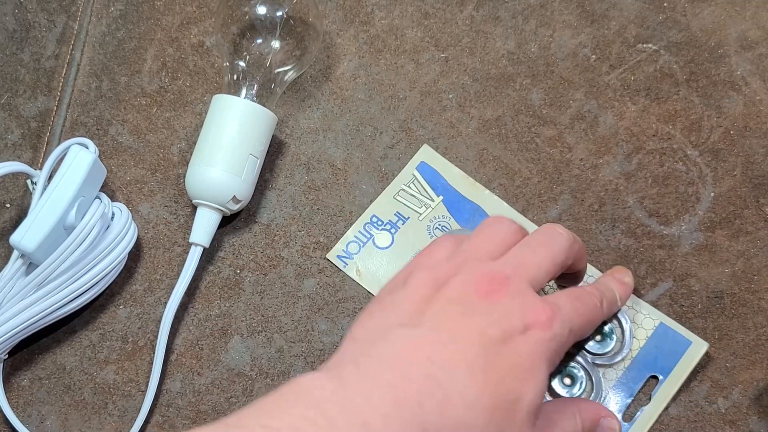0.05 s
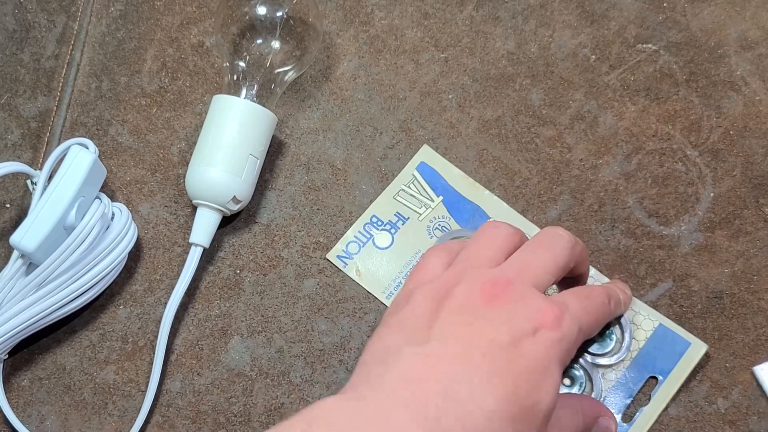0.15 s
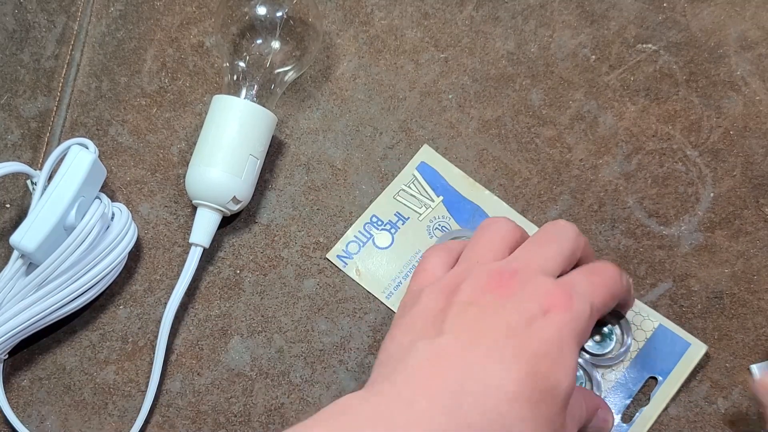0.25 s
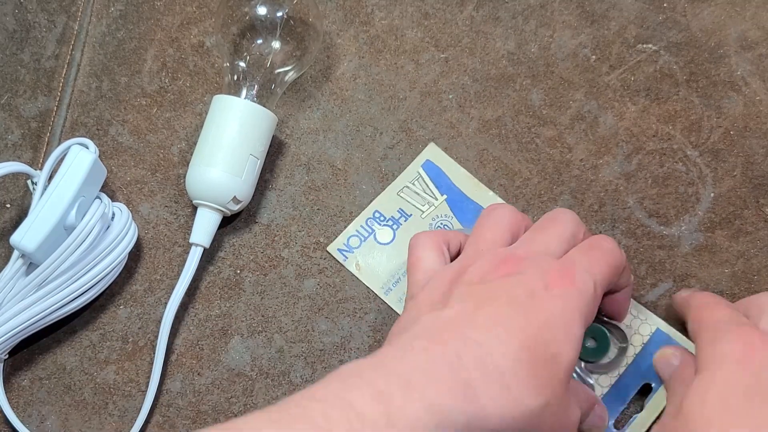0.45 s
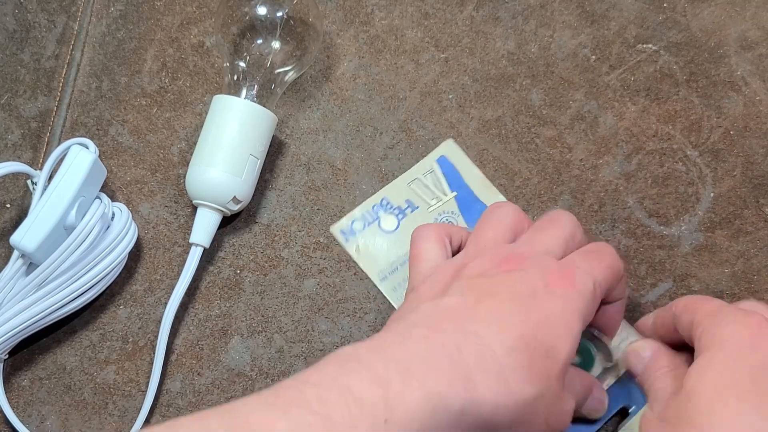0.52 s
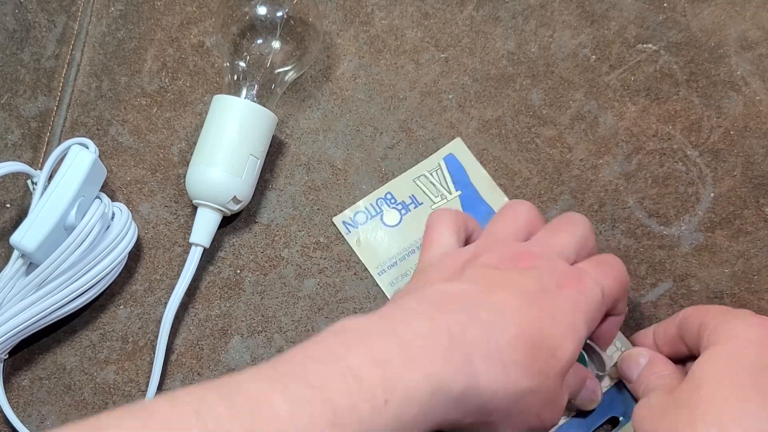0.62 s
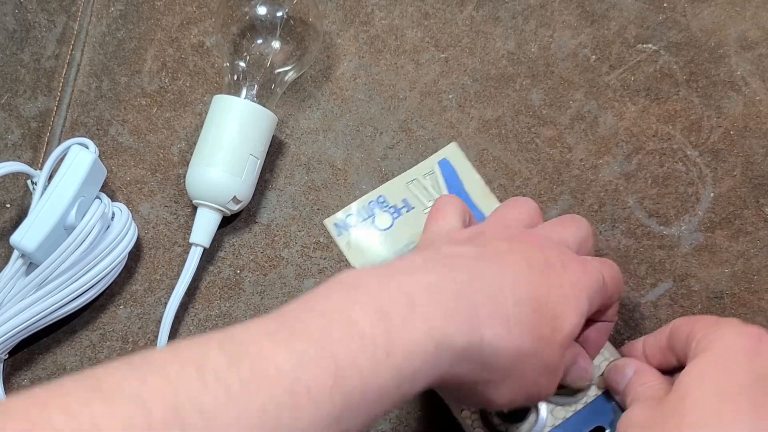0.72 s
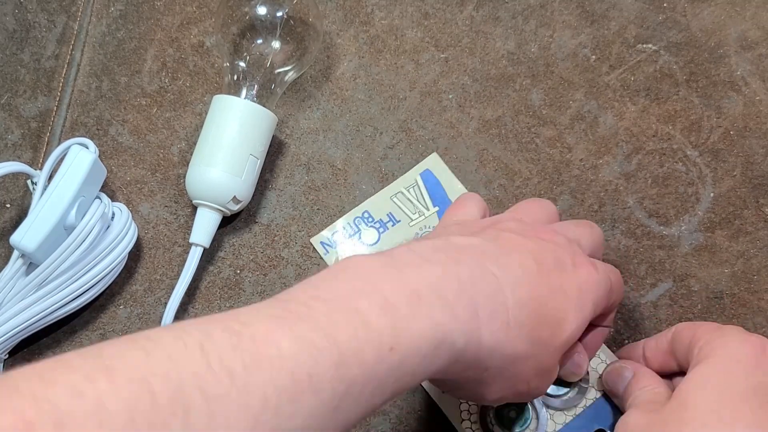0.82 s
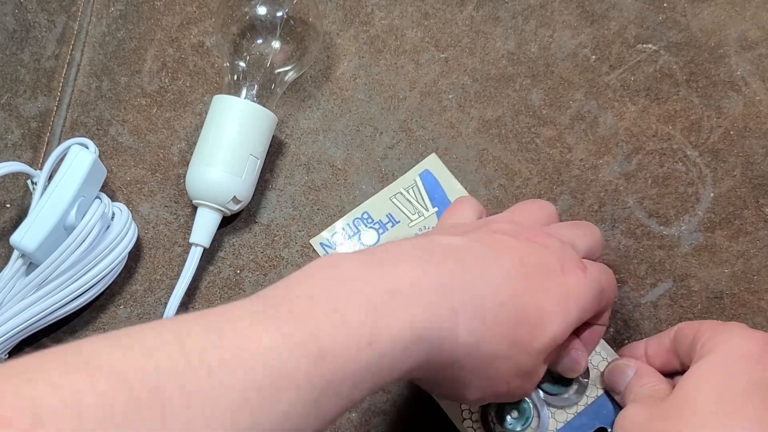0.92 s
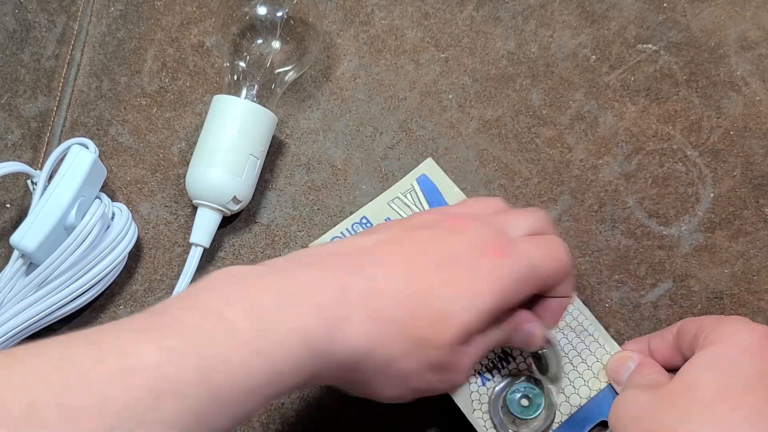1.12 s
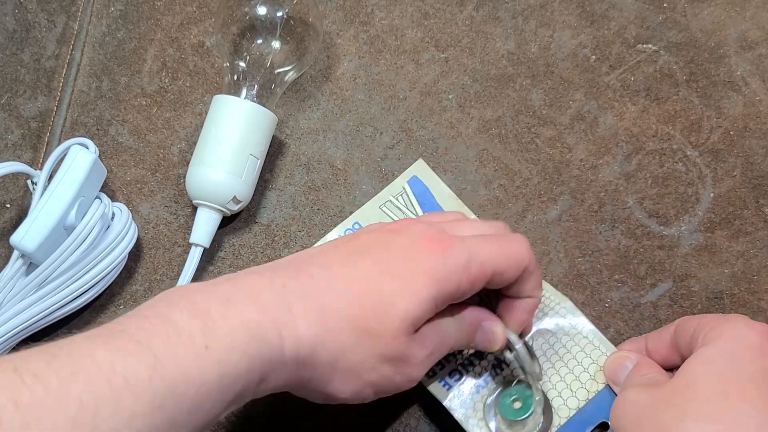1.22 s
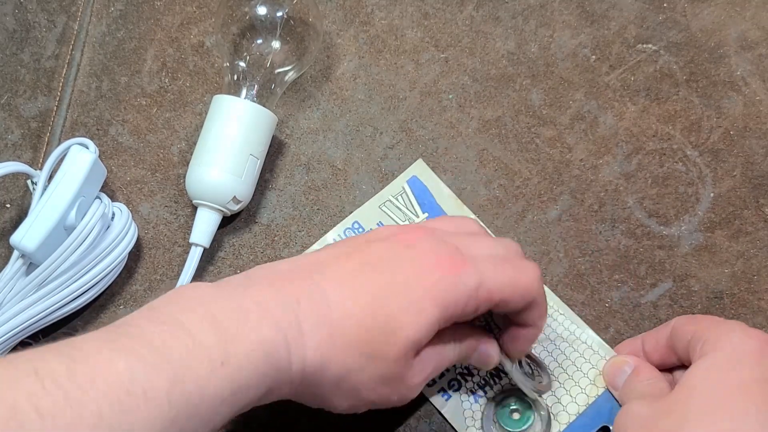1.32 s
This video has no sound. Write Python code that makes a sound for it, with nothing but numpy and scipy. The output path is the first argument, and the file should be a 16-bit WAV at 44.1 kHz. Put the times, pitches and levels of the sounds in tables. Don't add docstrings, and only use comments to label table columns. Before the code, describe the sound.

A plastic blister card slaps a bench top in a quick burst of snaps and wooden knocks, then quiet skin sliding, a small crisp pop and faint ticks, close stereo microphone, low room hum.

```python
import sys
import numpy as np
from scipy import signal
from scipy.fft import rfft, irfft, next_fast_len
from scipy.io import wavfile
from scipy.ndimage import uniform_filter1d

SR = 44100
rng = np.random.default_rng(int(sys.argv[2]) if len(sys.argv) > 2 else 0)


def generate_wav(signal):
    frames = np.transpose(np.atleast_2d(signal))
    scaled = np.clip(frames, -1, 1) * 32767
    pcm = np.round(scaled).astype(np.int16)
    wavfile.write(sys.argv[1], SR, pcm)


def natural_amplitude(level_db):
    exponent = np.asarray(level_db, float) / 20
    return 10 ** exponent


N = 59535

# frequency in Hz, left minus right in dB.
PORTS_HUM = [(60, -3), (240, -2.5), (950, -4), (3770, 3), (15000, 7.5)]
LEAD_CARD_S = -0.000158


def evened(x):
    return x / np.sqrt(np.mean(x ** 2) + 1e-20)


def read(points, hz):
    f, value = np.transpose(points)
    return np.interp(np.log(hz + 1), np.log(f + 1), value)


def follow(curve):
    s, db = np.transpose(curve)
    return natural_amplitude(np.interp(np.arange(N) / SR, s, db))


def add(mix, s, sound):
    part = mix[..., round(s * SR):][..., :sound.shape[-1]]
    part += sound[..., :part.shape[-1]]


def edge(x, hz):
    taps = signal.firwin(511, hz, window=("kaiser", 9), fs=SR)
    return signal.oaconvolve(x, taps[None], "same")


def ports(x, balance, lead_s):
    size = next_fast_len(N + 4096)
    hz = np.fft.rfftfreq(size, 1 / SR)
    half = natural_amplitude(read(balance, hz) / 2) * np.exp(1j * np.pi * hz * lead_s)
    mean = (abs(half) + 1 / abs(half)) / 2
    return irfft(rfft(x, size) * np.array([half, 1 / half]) / mean, size)[:, :N]


def hiss(tone, patchy_db, size):
    # frequency in Hz, likeness of the two ports from 0 to 1.
    likeness = [(60, 0.94), (700, 0.86), (1500, 0.76), (3000, 0.17), (15000, 0.23)]
    frames, hz = 4 * N // size + 5, np.fft.rfftfreq(size, 1 / SR)
    a, b, c, d, patches = rng.standard_normal((frames, len(hz), 5)).T
    patches = uniform_filter1d(patches, size=9, axis=0)
    patches = evened(uniform_filter1d(patches, size=9, axis=1))
    same = np.clip(read(likeness, hz), 0, 1)[:, None]
    left = a + 1j * b
    right = same * left + np.sqrt(1 - same ** 2) * (c + 1j * d)
    z = np.array([left, right]) * natural_amplitude(tone(hz)[:, None] + patchy_db * patches)
    return evened(signal.istft(z, nperseg=size, noverlap=size * 3 // 4)[1][:, :N])


def workshop():
    # frequency in Hz, level in dB.
    rumble_tone = [(12, -34), (20, -2), (117, -0.5), (360, -14), (416, -11), (566, -19.5), (619, -15.5),
                   (921, -21), (1500, -42), (1950, -36.5), (3300, -120)]
    # frequency in Hz, width in Hz, level in dB.
    hum_lines = [(59.4, 2.8, -57.5), (99.4, 8.3, -56), (120.1, 2.4, -53), (185, 11, -92), (285, 5.2, -67),
                 (439, 2.2, -70.5), (618, 0.96, -67)]
    out = natural_amplitude(-51) * hiss(lambda hz: read(rumble_tone, hz), patchy_db=.7, size=2048)
    t = np.arange(N) / SR
    for hz, width_hz, db in hum_lines:
        r = np.exp(-np.pi * width_hz / SR)
        chance = rng.standard_normal((2, N + SR))
        waver = signal.lfilter([1], [1, -2 * r, r * r], chance)[:, SR:]
        steady = 1.33
        turning = evened(waver[0]) + 1j * evened(waver[1]) + steady
        out = out + natural_amplitude(db) * evened((turning * np.exp(2j * np.pi * hz * t)).real)
    return ports(out, PORTS_HUM, LEAD_CARD_S)


def room(x):
    # frequency in Hz, time to fall 60 dB in seconds.
    decay = [(200, 0.44), (1000, 0.18), (4500, 0.23), (15000, 0.13)]
    # frequency in Hz, level in dB.
    colour = [(200, -3), (700, -4.5), (2000, -10), (4300, -8.5), (8000, -8.5), (13000, -4.5)]
    taps = np.zeros((2, SR // 2))
    slots = np.arange(120, SR // 2 - 20, 12)
    at = slots + rng.integers(0, 12, (2, len(slots)))
    np.put_along_axis(taps, at, rng.choice([-1., 1.], at.shape), 1)
    hz, t, z = signal.stft(taps, SR, nperseg=256)
    t60 = read(decay, hz)[:, None]
    fall = natural_amplitude(read(colour, hz)[:, None] - 60 * t / t60)
    energy = t60 * SR / 12 / (6 * np.log(10))
    tail = signal.istft(z * fall / np.sqrt(energy), SR, nperseg=256)[1]
    low = signal.lfilter(*signal.butter(2, 900, fs=SR), tail[0] - tail[1])
    return signal.fftconvolve(x, np.array([tail[0], tail[1] + low]), axes=1)[:, :N]


def sliding_skin():
    # time in seconds, level in dB.
    slide_level = [(0, -49), (.45, -51.5), (.53, -54), (.59, -47), (.66, -53), (.88, -53), (.99, -60),
                   (1.14, -64), (1.35, -75)]
    # frequency in Hz, level in dB.
    slide_tone = [(2650, -8.5), (4500, -8), (7030, -7), (7610, -3.5), (9440, -6), (12100, -5.5),
                  (13100, -4), (14100, -4), (15800, -3)]
    # frequency in Hz, width in Hz, lift in dB.
    slide_peaks = [(7600, 500, 4), (12000, 700, 6), (14300, 1000, 4)]

    def tone(hz):
        lift = sum(db / (1 + (2 * (hz - f) / w) ** 2) for f, w, db in slide_peaks)
        return read([(1500, -40)] + list(slide_tone), hz) + lift

    slide = follow(slide_level) * hiss(tone, patchy_db=.9, size=512)
    return ports(slide, PORTS_HUM, lead_s=0.000355)


def strained_shells():
    # time in seconds, level in dB.
    strain_level = [(0, -56.5), (.17, -61), (.2, -50), (.34, -55.5), (.42, -65), (.52, -67), (.59, -56.5),
                    (.66, -66), (.84, -62), (.89, -64.5), (1.0, -68), (1.05, -64.5), (1.11, -59),
                    (1.15, -61.5), (1.19, -60), (1.25, -54.5), (1.35, -58.5)]
    # frequency in Hz, level in dB.
    strain_tone = [(500, -2.5), (1000, 0), (1800, -1), (3000, -8.5), (4500, -13), (7000, -18), (16000, -23)]
    grain = natural_amplitude(1.1 * evened(uniform_filter1d(rng.standard_normal(N), size=90)))
    rustle = hiss(lambda hz: read(strain_tone, hz), patchy_db=1.2, size=512)
    return ports(follow(strain_level) * evened(grain * rustle), PORTS_HUM, lead_s=0)


def bench():
    # start in seconds, level in dB, contact in ms, favoured pitch in Hz.
    knocks = [(0.2028, -14, 0.72, 670), (.219, -10, 1.24, 570), (0.2264, -17.5, 1.77, 387),
              (0.2363, -15.5, 1.36, 382), (.2485, -20.5, 1.37, 403), (0.253, -26, 0.98, 590),
              (.263, -23, 1.4, 239), (.274, -28, 0.89, 616), (0.3078, -13.5, 0.93, 298),
              (.3125, -23, 1.2, 316), (.325, -23.5, 0.77, 405), (.3395, -27.5, 1.17, 385),
              (0.358, -29.5, 1.54, 286), (.373, -37.5, 1.3, 382), (1.0514, -36, 0.88, 490)]
    # frequency in Hz, level in dB, time to fall 60 dB in seconds.
    modes = [(117.4, -17.5, 0.17), (187, -20, 0.082), (245.3, -2.5, 0.061), (298, -7.5, 0.12),
             (385.5, -2.5, 0.13), (429.6, 2, 0.076), (546, 2, 0.061), (661.7, -12.5, 0.2), (737, -5, 0.053),
             (898, -2.5, 0.083), (985, -4, 0.047), (1205, -15, 0.055), (2126, -15, .07)]
    spot_octaves, skirt = .17, .25
    out, t = np.zeros(N), np.arange(SR // 2) / SR
    for s, db, ms, spot_hz in knocks:
        ring = 0
        for hz, mode_db, t60 in modes:
            near = skirt + np.exp(-.5 * (np.log2(hz / spot_hz) / spot_octaves) ** 2)
            ring = ring + near * natural_amplitude(mode_db - 60 * t / t60) * np.sin(2 * np.pi * hz * t)
        push = np.sin(np.pi * np.clip(t[:200] * 1000 / ms, 0, 1)) ** 2
        add(out, s, -natural_amplitude(db) / 2 * np.convolve(ring, push / push.sum()))
    return signal.lfilter(*signal.butter(2, 139, "high", fs=SR), out)


def snap(db, centre_hz, octaves, pan_db, modes, cracks):
    hz = np.fft.rfftfreq(4096, 1 / SR)
    band = np.exp(-.5 * (np.log2((hz + 1) / centre_hz) / octaves) ** 2)
    shell = 1 + natural_amplitude(10) * sum(natural_amplitude(d) / (1 + (2 * (hz - f) / w) ** 2) for f, w, d in modes)
    cep = irfft(np.log(band * shell + 1e-3))
    causal = np.exp(rfft(np.r_[cep[0], 2 * cep[1:2048], cep[2048], np.zeros(2047)]))
    out = irfft(rfft(cracks, 4096) * causal)
    strength = np.sqrt((out ** 2).sum(1).mean() / (SR * .002))
    return natural_amplitude(db) * out / strength * natural_amplitude(np.array([[pan_db], [-pan_db]]) / 2)


def shells():
    # start in seconds, level in dB, centre in Hz, spread in octaves, fade in ms.
    snaps = [(0.2037, -15, 7560, 2.24, 3.4), (0.208, -18.5, 5930, 2.3, 5.6),
             (.2196, -10.5, 6000, 0.99, 2.7), (0.222, -16, 5500, 1.7, 2), (.2252, -11, 6540, 0.81, 1.8),
             (0.2293, -16, 4870, 1.4, 2.8), (0.2385, -23.5, 4700, 0.46, 2.6),
             (0.3085, -28.5, 7000, 1.2, 3.1), (0.4149, -31, 13300, 0.66, 1.1),
             (0.878, -37, 11000, 0.6, 1.7), (1.0524, -30, 2950, 1.1, 0.29), (1.0534, -28, 7000, 1.08, 1.5),
             (1.0579, -35.5, 2550, 1, 3), (1.060, -34.5, 3760, 0.31, 0.5), (1.2935, -33, 11550, 0.25, 0.42)]
    # start in seconds, level in dB, centre in Hz, spread in octaves, pan in dB.
    ticks = [(.1885, -42.5, 1180, 0.2, -3), (0.203, -28, 1740, .11, -2), (.2045, -25.5, 6100, 0.063, 0),
             (0.2186, -15, 1758, .08, -3.5), (0.2195, -23.5, 1182, 0.14, -2.5),
             (.2222, -23.5, 3380, 0.13, 2), (0.2252, -35, 4180, .1, -7.5), (0.2313, -28, 4110, 0.076, 0),
             (0.2381, -33.5, 1026, 0.13, -6.5), (.233, -29.5, 2132, .06, 4), (0.3037, -41, 1500, 0.23, -2),
             (.3088, -33, 1960, .15, -4), (.3085, -32.5, 1040, 0.46, -0.5), (.3095, -38, 11400, .1, 3),
             (0.8771, -45.5, 6200, 0.098, 12), (0.8782, -44.5, 2200, 0.53, 12),
             (0.8821, -43, 2220, 0.69, -2), (1.0506, -39.5, 887, 0.87, -1), (1.052, -26, 4434, 0.089, 1),
             (1.0527, -38, 1100, .15, 2.5), (1.053, -32.5, 3100, 0.084, -6),
             (1.058, -32.5, 1937, 0.11, -3.5), (1.1006, -45.5, 2980, 0.13, 2), (1.1016, -48, 1480, 0.37, 5),
             (1.128, -48.5, 1490, 0.5, 0), (1.129, -53, 3070, 0.12, -4), (1.1658, -42.5, 1250, 0.27, -4),
             (1.168, -51.5, 2200, 0.54, 4), (1.182, -66, 14000, 0.18, -8), (1.2245, -56, 14000, 0.2, -2),
             (1.228, -41.5, 2700, 0.45, 0.5), (1.2278, -47, 1400, 0.38, -2), (1.252, -50.5, 7400, 0.5, 4),
             (1.2285, -57, 7800, 0.23, -1), (1.251, -56, 3200, 0.096, 2), (1.258, -52, 4860, 0.43, -5),
             (1.2931, -40.5, 3000, 0.18, 3), (1.2934, -47.5, 5050, 0.28, 6), (1.2942, -47, 1600, 0.5, 13),
             (1.3, -48.5, 3300, 0.35, 0.5)]
    # frequency in Hz, width in Hz, level in dB.
    closed_modes = [(1740, 1400, 0.5), (3400, 880, -3), (4160, 830, 2.5), (4850, 310, -12.5),
                    (6200, 1600, -13.5), (8060, 210, -11), (9800, 2900, -10.5), (12060, 1140, -8.5),
                    (14700, 1400, -3)]
    # frequency in Hz, width in Hz, level in dB.
    opened_modes = [(1154, 180, 3), (1825, 160, 13), (2040, 330, 7.5), (3140, 230, -4), (4220, 340, 2),
                    (6100, 550, 0.5), (7500, 590, -1), (11000, 12000, -14), (15240, 1160, -1)]
    opening_s, opening_pan_db = 1., 1.
    rattle_db, rattle_ms = -15, 1.2
    out, t = np.zeros((2, N)), np.arange(1500) / SR
    for s, db, hz, octaves, ms in snaps:
        late = s > opening_s
        one, other, uneven = rng.standard_normal((3, len(t)))
        burst = natural_amplitude(1.2 * uneven) * np.sqrt(t) * np.exp(-t * 1000 / ms)
        cracks = np.array([one, .8 * one + .6 * other]) * burst
        modes = opened_modes if late else closed_modes
        add(out, s, snap(db, hz, octaves, late * opening_pan_db, modes, cracks))
    for s, db, hz, octaves, pan_db in ticks:
        rattle = rng.standard_normal((2, len(t))) * np.exp(-t * 1000 / rattle_ms)
        crack = (t == 0) + natural_amplitude(rattle_db) * rattle
        add(out, s, snap(db, hz, octaves, pan_db, [], crack))
    later = np.roll(out[1], round(-LEAD_CARD_S * SR))
    return np.array([out[0], np.where(np.arange(N) > opening_s * SR, later, out[1])])


def scene():
    # frequency in Hz, left minus right in dB.
    ports_card = [(60, -6), (700, -4), (1400, 3), (15000, 2.5)]
    top = natural_amplitude(-11)
    plastic, wood = shells(), bench()
    card = (1 - top) * plastic + wood + room(plastic + natural_amplitude(-13.5) * wood)
    close = ports(top * plastic + edge(card, 15750), ports_card, LEAD_CARD_S)
    hand = sliding_skin() + strained_shells()
    return close + edge(hand, 15750) + workshop()


def top_cut(x):
    return signal.sosfilt(signal.butter(12, 16830, fs=SR, output="sos"), x)


def record(dry):
    return top_cut(edge(dry, 16500))


dry = scene()
out = record(dry)
generate_wav(out)
```